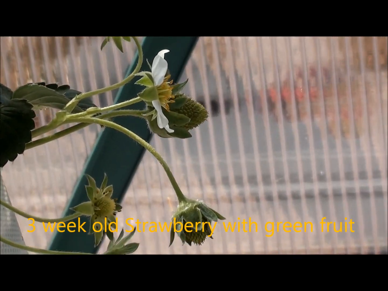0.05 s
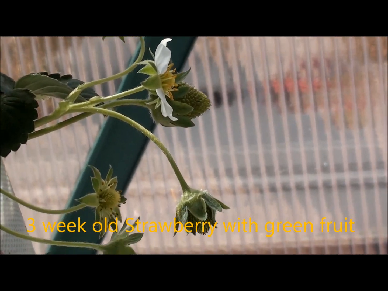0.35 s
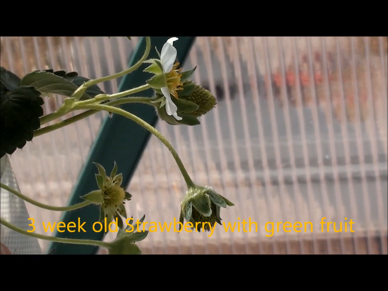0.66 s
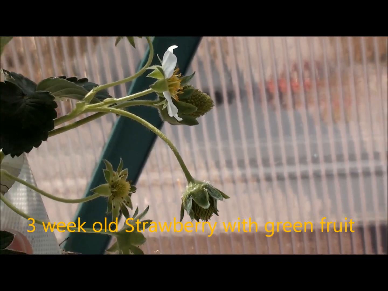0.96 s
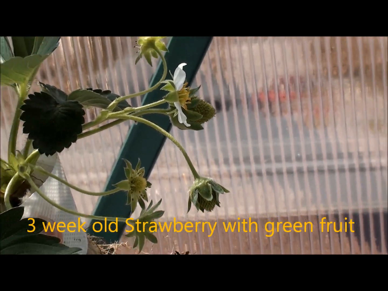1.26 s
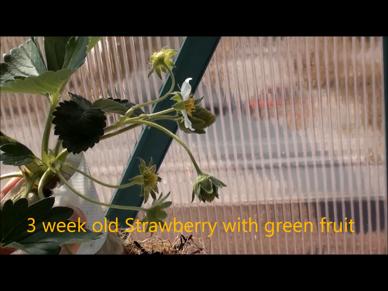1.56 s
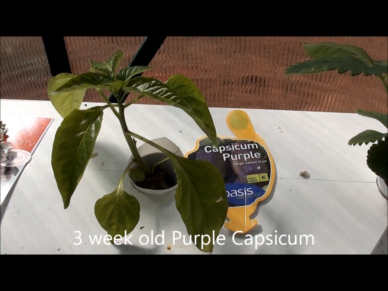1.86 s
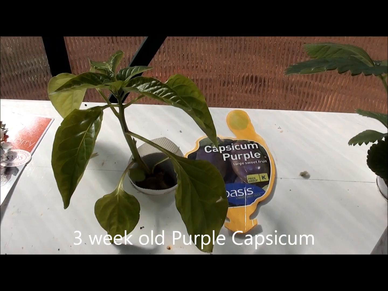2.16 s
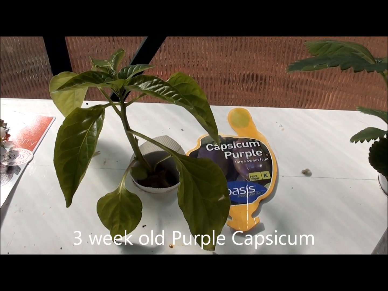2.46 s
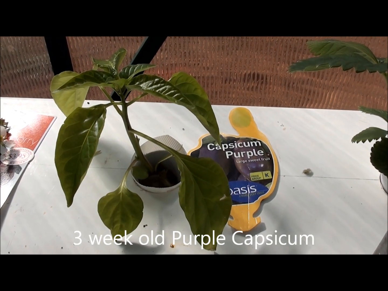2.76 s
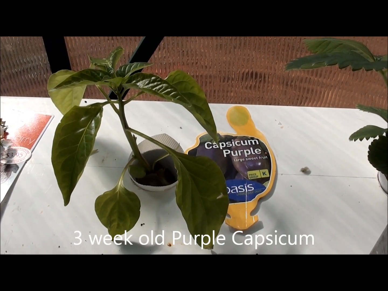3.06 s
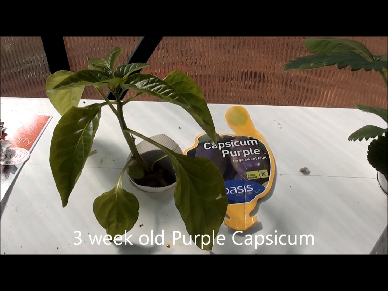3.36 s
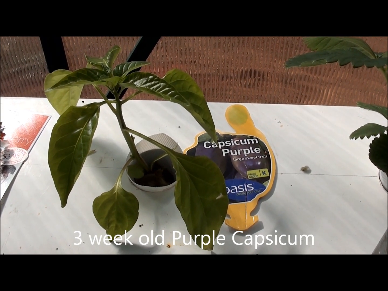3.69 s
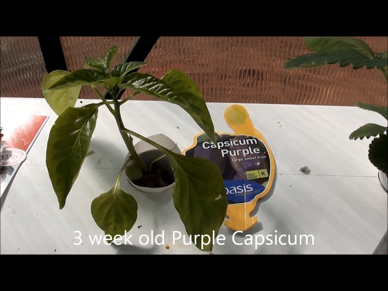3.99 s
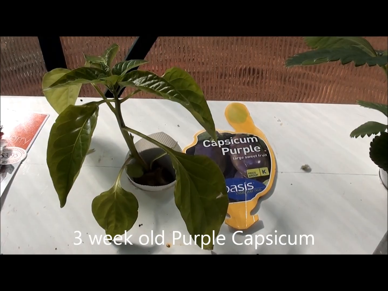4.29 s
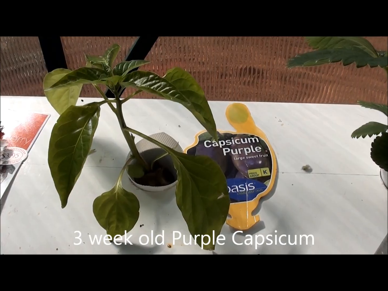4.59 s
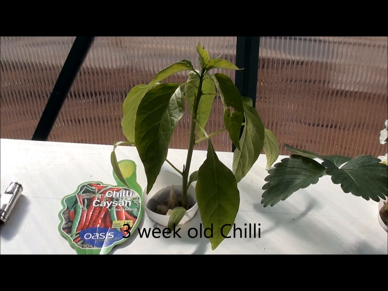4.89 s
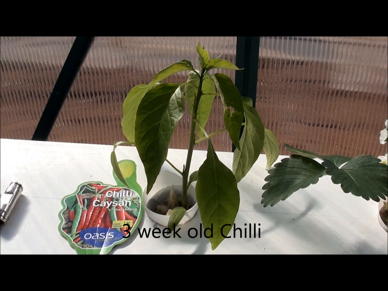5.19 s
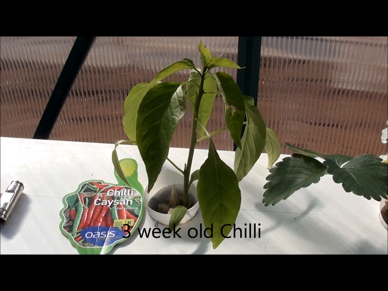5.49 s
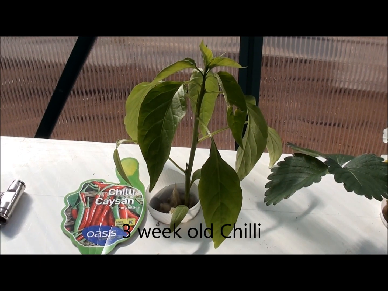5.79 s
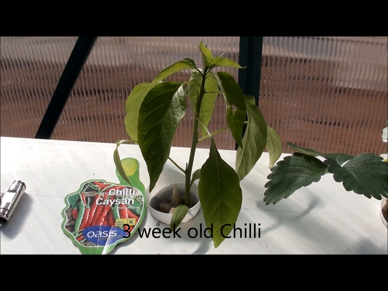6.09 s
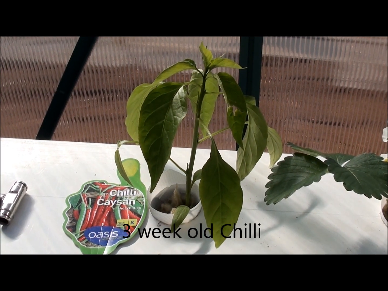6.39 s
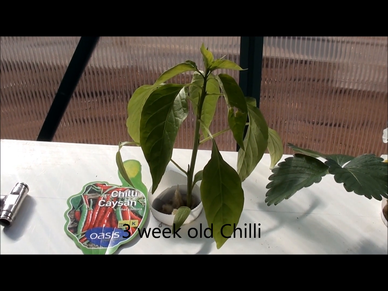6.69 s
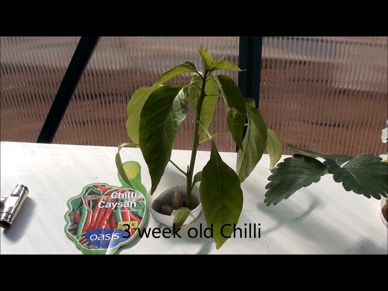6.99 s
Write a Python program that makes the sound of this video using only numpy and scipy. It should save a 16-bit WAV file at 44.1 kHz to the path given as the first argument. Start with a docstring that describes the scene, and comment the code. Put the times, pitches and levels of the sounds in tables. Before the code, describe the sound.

Water runs into a tank from the start, heard from nearby in a small plastic greenhouse. It churns and gurgles under a fine spray, with small ringing bubbles and an occasional sharp drip. Beneath it a pump gives a steady low electric hum, a faint wavering whine and a slight rumble. The walls add a short echo. At about 1.7 seconds everything cuts to silence. At 2.2 seconds the water and pump return with a slightly different tone, brighter and with many small sizzling splashes, until another cut at about 4.8 seconds. At 5.2 seconds they come back quieter and swell to their earlier level by about 6 seconds. This last stretch has more gurgle, scattered plips and fewer, softer splashes, and runs with the hum to the end at about 7.3 seconds.

```python
"""A small plastic greenhouse with a hydroponic pump running, heard from three spots with silence between.
The returning water churns, traps ringing bubbles and throws up splashes, all smeared by the hard walls.
Under it the pump hums on the mains, its impeller whines and the tank shakes.
Each spot has its own tone and its own blend of water and pump."""
import sys
import numpy as np
from scipy import signal
from scipy.fft import rfft, irfft, next_fast_len
from scipy.io import wavfile

SR = 44100
rng = np.random.default_rng(int(sys.argv[2]) if len(sys.argv) > 2 else 0)


def output_pcm(signal):
    """Save a mono or channel-first signal as 16-bit PCM at the path in sys.argv[1].

    Samples are clipped to [-1, 1] before scaling.
    """
    pcm = np.clip(np.atleast_2d(signal).T, -1, 1) * 32767
    wavfile.write(sys.argv[1], SR, np.round(pcm).astype(np.int16))


N = 319725
TIME = np.arange(N) / SR

# when each listening spot is heard: (start [s], end [s])
SPOTS = [(0, 1.694), (2.178, 4.763), (5.244, 7.25)]
# fader ride on stream, pump and hiss, swelling into the last spot: (time [s], level [dB])
FADER = [(4.9, 0), (5.25, -5.5), (5.65, -3), (6.1, -1), (7.25, 0.25)]


def water(t, spot):
    """Falling water: low churn, gurgle and fine spray, each bubbles on a noise wash, with mist on top."""
    # tone of the water: (frequency [Hz], relative level at spot 0, 1, 2 [dB])
    water_eq = [(250, -5, -7, -2), (330, -9.5, -8.5, -4), (417, -0.5, -8.5, 0), (610, -6, -9, -4.5),
                (846, -10.5, -11.5, -8), (1370, -16, -10, -10.5), (1500, -15, -13.5, -10.5),
                (1970, -16, -10.5, -9), (3020, -20, -17.5, -15.5), (4640, -24.5, -24.5, -14.5),
                (5730, -24.5, -22.5, -17.5), (7650, -22, -22.5, -23.5), (9150, -25, -26, -30),
                (12000, -32, -26.5, -30)]
    # blend of the stream, one row a spot: (churn [dB], gurgle [dB], spray [dB], mist [dB])
    blend = [(-35.5, -35, -37.5, -53.5), (-35, -35, -34.3, -46.5), (-35, -33, -36.5, -58.5)]
    # the flow swelling and slackening: (time [s], level [dB])
    flow = [(0, 0.5), (0.3, -0.8), (0.6, -0.6), (1.0, -0.5), (1.42, 1.5), (1.7, -1.8), (2.2, -0.2),
            (2.85, 1), (3.55, -0.3), (3.8, 0.8), (4.25, -0.9), (4.6, 1), (5.25, 0.5), (5.75, -0.8),
            (6.15, 0.5), (6.75, -0.6), (7.05, -1), (7.25, -1.5)]
    eq = np.array(water_eq)[:, [0, spot + 1]]
    *levels_db, mist_db = blend[spot]
    churn = bubble_cloud(t, 256, 771, per_s=110, cycles=16, size_db=2.5, wet_db=2.5)
    gurgle = bubble_cloud(t, 800, 3500, per_s=260, cycles=47.4, size_db=3.5, wet_db=6)
    spray = bubble_cloud(t, 3504, 12000, per_s=500, cycles=24, size_db=4, wet_db=6)
    spray += from_db(-4.5) * patter(t, per_s=110, size_db=8)
    spattering = surges(t, per_s=40, t60=0.14, depth=0.8)
    # (low edge [Hz], high edge [Hz], bubbles, relative wash level [dB], envelope)
    registers = [(250, 1030, churn, -0.5, surges(t, per_s=43, t60=0.23, depth=0.65)),
                 (827, 3600, gurgle, -3, surges(t, per_s=61, t60=0.15, depth=0.35)),
                 (3320, 8300, spray, -4, spattering)]
    out = from_db(mist_db) * rms_one(mist(t) * spattering)
    for (low, high, cloud, wash_db, envelope), level_db in zip(registers, levels_db):
        wash = from_db(wash_db) * rng.standard_normal(cloud.shape)
        bubbles = cloud * np.sqrt(2 * (high - low) / SR)   # about as strong per Hz as unit noise
        layer = colour(bubbles + wash, lambda hz: band(hz, low, high) * from_db(at_hz(eq, hz)))
        out += from_db(level_db) * rms_one(layer * envelope)
    return out * ride(flow, t)


def bubble(hz, cycles, rise):
    """A trapped air pocket rings for some cycles, its pitch rising as it nears the surface."""
    life_s = cycles / hz
    age = TIME[:int(life_s * SR)] / life_s
    phase = 2 * np.pi * cycles * age * (1 + rise * age / 2)
    attack = 1 - np.exp(-age * cycles)
    return np.sin(phase) * from_db(-60 * age) * attack


def bubble_cloud(t, low_hz, high_hz, per_s, cycles, size_db, wet_db):
    """Many small bubbles of random pitch and strength blur together between the walls."""
    out = np.zeros(len(t))
    for when, pitch, size in rng.random((int(per_s * len(t) / SR), 3)):
        hz = low_hz * (high_hz / low_hz) ** pitch
        accent_db = size_db * min(-np.log(1 - size), 3)
        strength = from_db(accent_db) * hz   # lifting the short, high rings keeps the spectrum flat
        add(out, when * len(t) / SR, strength * bubble(hz, cycles, rise=0.15))
    return rms_one(greenhouse(out, wet_db))


def surges(t, per_s, t60, depth):
    """The stream lands in gobs: each one lifts the bubbling at once and then fades."""
    gobs = (rng.random(len(t)) < per_s / SR).astype(float)
    power_decay = from_db(-60 / (t60 * SR)) ** 2
    power = signal.lfilter([1], [1, -power_decay], gobs)
    return np.sqrt(1 + 2 * depth * power)


def plips(rise=0.012, scatter=0.16, lag_s=0.025):
    """Big bubbles ring out of the gurgle, each trailed by three weaker ones of nearly its size."""
    # big bubbles: (time [s], pitch [Hz], relative level [dB])
    cues = [(0.065, 2083, -28.5), (0.288, 1200, -31.5), (0.327, 2530, -32.5), (0.911, 1740, -30),
            (1.071, 1295, -31), (1.297, 1166, -34.5), (1.455, 1990, -27.5), (1.589, 1442, -33.5),
            (2.178, 1744, -29.5), (2.249, 1830, -31.5), (2.324, 856, -31), (2.42, 495, -28),
            (2.665, 1670, -30.5), (2.811, 1914, -28), (2.971, 725, -28), (3.057, 2220, -29.5),
            (3.267, 1733, -26), (3.369, 1292, -30.5), (3.614, 2030, -29.5), (3.778, 1870, -27.5),
            (3.862, 1900, -30), (4.058, 2330, -28.5), (4.388, 680, -32), (4.565, 658, -32),
            (4.622, 2600, -26), (5.272, 1750, -30), (5.564, 1796, -27.5), (5.902, 385, -28.5),
            (5.913, 1860, -32), (6.086, 1740, -30.5), (6.181, 1410, -36), (6.317, 2280, -34),
            (6.532, 1245, -32), (6.565, 1132, -31), (6.753, 2030, -26), (6.784, 2040, -27.5),
            (6.913, 1650, -32), (7.02, 2453, -24.5), (7.103, 1216, -28)]
    out = np.zeros(N)
    for start, hz, db in cues:
        cycles = min(100, 0.084 * hz)   # the largest burst early, after 84 ms
        gain = from_db(db + 5.5)
        add(out, start, gain * bubble(hz, cycles, rise))
        for late, size in rng.random((3, 2)):
            pitch = hz * np.exp(scatter * (2 * size - 1))
            follower = from_db(-4.5) * bubble(pitch, cycles / 2, rise)
            add(out, start + lag_s * late, gain * follower)
    return greenhouse(out, wet_db=0.5)


def splashes():
    """The stream throws up bright splashes that sizzle away."""
    # splashes: (time [s], centre [Hz], relative level [dB])
    cues = [(0.08, 7500, -32), (0.446, 4930, -30), (2.196, 10720, -29), (2.38, 7200, -21.5),
            (2.566, 6500, -25.5), (2.667, 8370, -26), (2.744, 6210, -22.5), (2.79, 2500, -28),
            (3.068, 4940, -28), (3.423, 6130, -27), (3.825, 6190, -22), (3.897, 7200, -30),
            (4.002, 6900, -26.5), (4.067, 8500, -21.5), (4.132, 5930, -26), (4.285, 5640, -23),
            (4.484, 3140, -27.5), (4.49, 12350, -28.5), (4.588, 5820, -26), (4.74, 5900, -24),
            (5.95, 3890, -29.5), (6.099, 7500, -36), (6.29, 6090, -33.5), (6.563, 3320, -29),
            (6.931, 4020, -29), (7.044, 3100, -27)]
    return bursts(cues, hold_s=0.0065, t60=0.13, width=0.16, gain_db=-3.5, wet_db=-5)


def drips():
    """Drops smack the surface close by, short and nearly dry."""
    # drops: (time [s], centre [Hz], relative level [dB])
    cues = [(0.032, 5500, -24.5), (0.612, 5500, -24), (3.3, 7000, -25), (5.492, 4770, -27),
            (6.832, 4740, -27)]
    return bursts(cues, hold_s=0.001, t60=0.014, width=0.24, gain_db=-1, wet_db=-9)


def bursts(cues, hold_s, t60, width, gain_db, wet_db):
    """Water hitting water: a sudden fizz around one pitch that holds a moment and dies."""
    out, t = np.zeros(N), TIME[:SR // 6]
    envelope = from_db(-60 * np.maximum(t - hold_s, 0) / t60)
    for start, centre, db in cues:
        noise = rng.standard_normal(len(t))
        fizz = colour(noise, lambda hz: 1 / (1 + (np.log(hz / centre) / width) ** 2))
        add(out, start, from_db(db + gain_db) * envelope * rms_one(fizz))
    return greenhouse(out, wet_db)


def patter(t, per_s, size_db):
    """Fine droplets tick on the surface, each with a short wake off the walls."""
    sizes = from_db(size_db * np.minimum(rng.exponential(1, len(t)), 2))
    landings = rng.random(len(t)) < per_s / SR
    ticks = sizes * landings * rng.choice([-1, 1], len(t))
    return rms_one(greenhouse(ticks, wet_db=0.5))


def mist(t, db_per_octave=-10):
    """The tiniest droplets tick and fizz in the top octave."""
    fizz = patter(t, per_s=170, size_db=4.5) + from_db(-5.5) * rng.standard_normal((2, len(t)))
    return colour(fizz, lambda hz: band(hz, 8500, 16000) * from_db(db_per_octave * np.log2(hz)))


def pump(t, spot, mains_hz=50):
    """Hum, whine and tank resonances, weighted at each spot by standing waves, over a faint rumble."""
    # mains hum: (harmonic number, level at spot 0, 1, 2 [dB])
    hum = [(1, -58.5, -55, -58), (2, -33, -34.5, -34), (3, -48.5, -50, -53), (4, -39.5, -56.5, -41),
           (5, -45.5, -46.5, -48.5), (6, -52, -66, -51), (7, -45, -48.5, -48), (12, -52.5, -50, -48),
           (14, -52.5, -52, -49), (18, -55, -47.5, -59)]
    # unsteady impeller whine: (pitch [Hz], level at spot 0, 1, 2 [dB])
    whine = [(389.6, -44, -39.5, -38), (459.5, -42.5, -59, -48), (953, -52, -57.5, -47.5),
             (995, -48.5, -54.5, -48.5)]
    # tank and pipes shaken by the flow: (centre [Hz], half-width [Hz], level at spot 0, 1, 2 [dB])
    tank = [(122.6, 6.3, -48, -40.5, -43.5), (216.8, 19, -45.5, -39, -48), (366.6, 31, -44.5, -40, -45),
            (474, 37, -39.5, -45.5, -45.5)]
    out = np.zeros((2, len(t)))   # mid and side; the tones sit in the mid
    for harmonic, *levels in hum:
        out[0] += from_db(levels[spot]) * tone(t, harmonic * mains_hz, waver_db=0.5, wander_hz=0.017)
    for pitch, *levels in whine:
        out[0] += from_db(levels[spot]) * tone(t, pitch, waver_db=1.6, wander_hz=1.17)
    for centre, width, *levels in tank:
        shaken = colour(rng.standard_normal(out.shape), lambda hz: 1 / (1 + ((hz - centre) / width) ** 2))
        out += from_db(levels[spot]) * rms_one(shaken)
    rumble = colour(rng.standard_normal(out.shape), lambda hz: band(hz, 135, 230, order=2))
    return out + from_db(-47.5) * rms_one(rumble)


def tone(t, hz, waver_db, wander_hz):
    """One partial of the pump: a sine of unit rms whose level and pitch waver."""
    pitch = hz + wander_hz * drift(t, per_s=9.41)
    phase = 2 * np.pi * (rng.random() + np.cumsum(pitch) / SR)
    return rms_one(np.sin(phase) * from_db(waver_db * drift(t, per_s=14)))


def greenhouse(x, wet_db, t60=0.26):
    """The direct sound and a dense short tail off the plastic walls, as mid and side."""
    t = TIME[:SR // 2]
    response = rng.standard_normal((2, len(t))) * from_db(-60 * t / t60) * (t > 0.003)
    response *= from_db(wet_db) / np.sqrt(np.sum(response ** 2, axis=1, keepdims=True))
    response[0, 0] = 1   # direct sound, mid only
    return signal.fftconvolve(x[None], response, axes=1)[:, :len(x)]


def stereo_image(pair):
    """Mid and side become left and right: narrow in the bass and the very top, wider between."""
    # narrowness of the image: (frequency [Hz], left-right likeness [0 to 1])
    likeness = [(100, .994), (290, .976), (480, .955), (640, .895), (1410, .82), (3100, .71), (6820, .65),
                (9500, .89), (11500, .992), (14000, .999)]
    # the lows lean right, the highs left: (frequency [Hz], left minus right [dB])
    balance = [(380, -1.6), (700, -.8), (1300, 1.1), (2400, 1.9), (4400, 2.3), (8100, 1.2), (11500, 0)]
    mid = colour(pair[0], lambda hz: np.sqrt((1 + at_hz(likeness, hz)) / 2))
    side = colour(pair[1], lambda hz: np.sqrt((1 - at_hz(likeness, hz)) / 2))
    left = colour(mid + side, lambda hz: from_db(at_hz(balance, hz) / 2))
    right = colour(mid - side, lambda hz: from_db(-at_hz(balance, hz) / 2))
    return np.array([left, right])


def from_db(db):
    """Decibels to gain."""
    return 10 ** (np.asarray(db) / 20)


def rms_one(x):
    """Scale to unit rms."""
    return x / np.sqrt(np.mean(x ** 2) + 1e-20)


def ride(points, t):
    """Gain along a curve of (time [s], level [dB])."""
    return from_db(np.interp(t, *np.transpose(points)))


def at_hz(points, hz):
    """Read a curve on a log-frequency axis."""
    known, values = np.transpose(points)
    return np.interp(np.log(hz), np.log(known), values)


def colour(x, gain):
    """Equalise with a gain that is a function of frequency."""
    size = next_fast_len(x.shape[-1] + 4096)
    hz = np.maximum(np.fft.rfftfreq(size, 1 / SR), 1)
    return irfft(rfft(x, size) * gain(hz), size)[..., :x.shape[-1]]


def band(hz, low_hz, high_hz, order=6):
    """Gain of a band-pass; the order steepens its edges."""
    return 1 / np.sqrt((1 + (low_hz / hz) ** (2 * order)) * (1 + (hz / high_hz) ** (2 * order)))


def drift(t, per_s):
    """A slow random wobble of unit rms."""
    knots = rng.standard_normal(1000)
    return rms_one(np.interp((t - t[0]) * per_s, np.arange(len(knots)), knots))


def add(out, start_s, sound):
    """Mix a sound in at a time."""
    piece = out[..., max(int(start_s * SR), 0):][..., :sound.shape[-1]]
    piece += sound[..., :piece.shape[-1]]


def scene():
    """A bed of water and pump at each spot, with plips, splashes and drips on top."""
    out = plips() + splashes() + drips()
    for spot, (start, end) in enumerate(SPOTS):
        t = TIME[int(start * SR):int(end * SR)]
        add(out, start, (water(t, spot) + pump(t, spot)) * ride(FADER, t))
    return stereo_image(out)


def record(dry, hiss_db=-44, cutoff_hz=15800):
    """Faint hiss and a steep top cut; each spot opens quickly and shuts with a brief faint tail."""
    hiss = from_db(hiss_db) * ride(FADER, TIME) * rng.standard_normal(N)
    gate = np.zeros(N)
    for start, end in SPOTS:
        corners_s = [start - 0.003, start + 0.007, end - 0.001, end, end + 0.032]
        gate += np.interp(TIME, corners_s, [0, 1, 1, 0.03, 0])
    return colour((dry + hiss) * gate, lambda hz: 1 / np.sqrt(1 + (hz / cutoff_hz) ** 400))


dry = scene()
out = record(dry)
output_pcm(out)
```